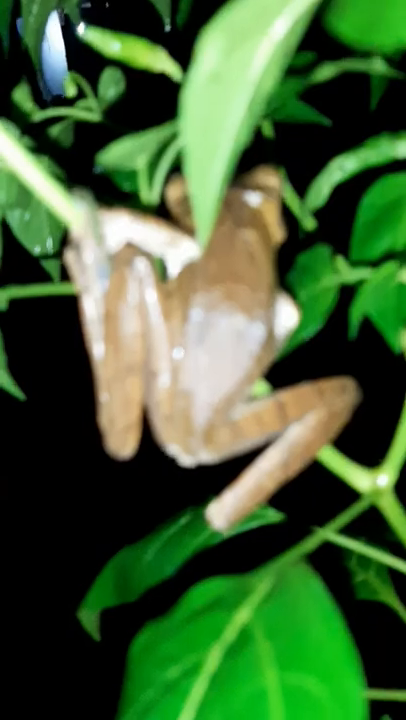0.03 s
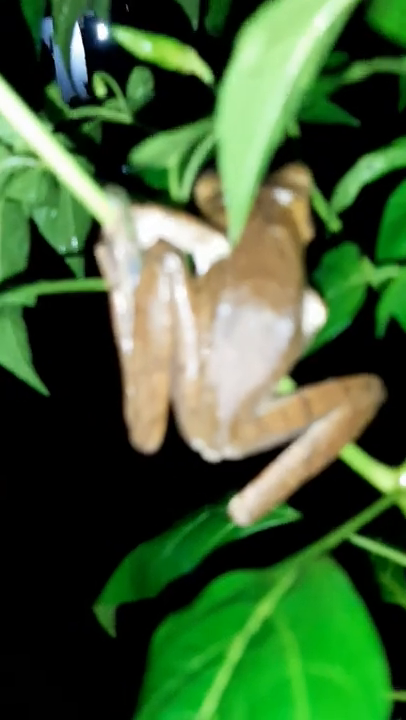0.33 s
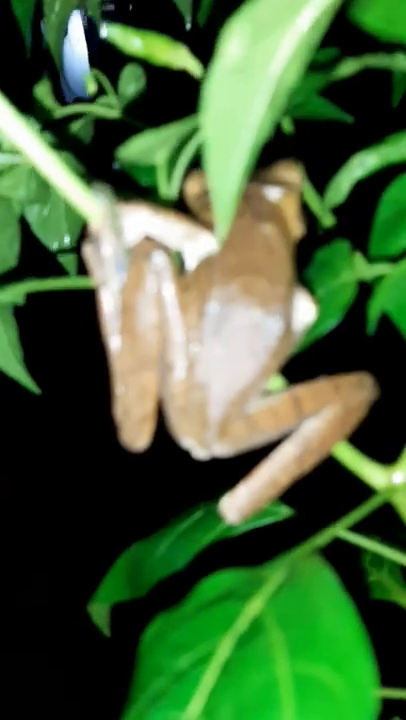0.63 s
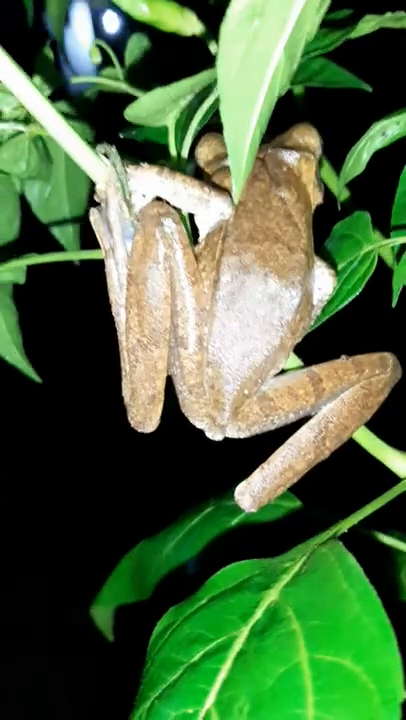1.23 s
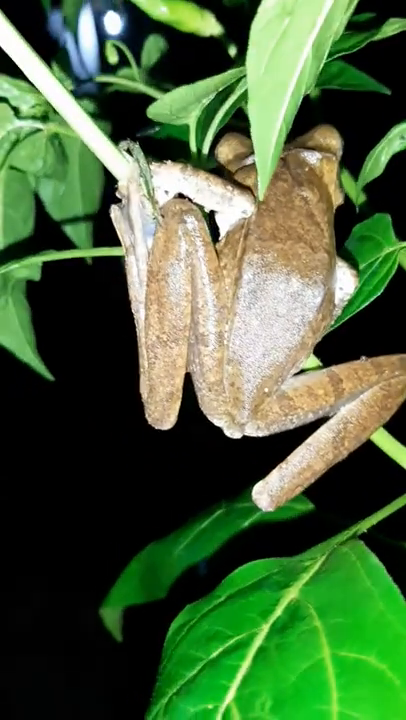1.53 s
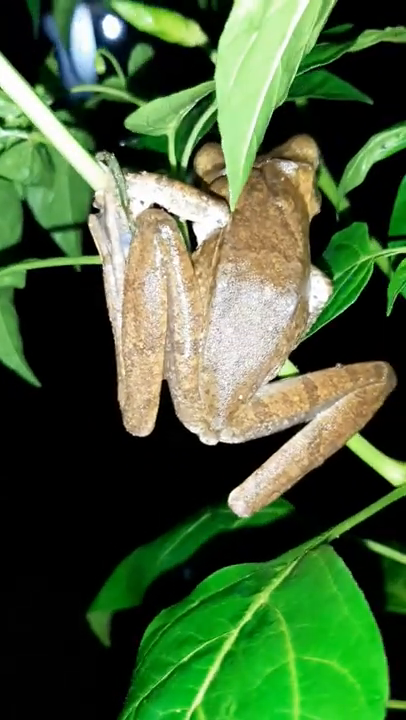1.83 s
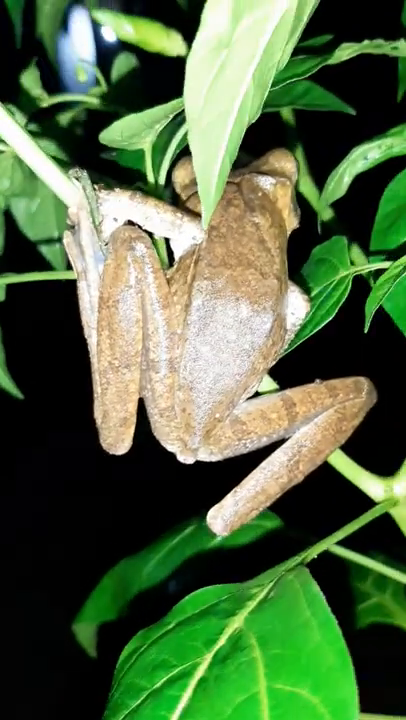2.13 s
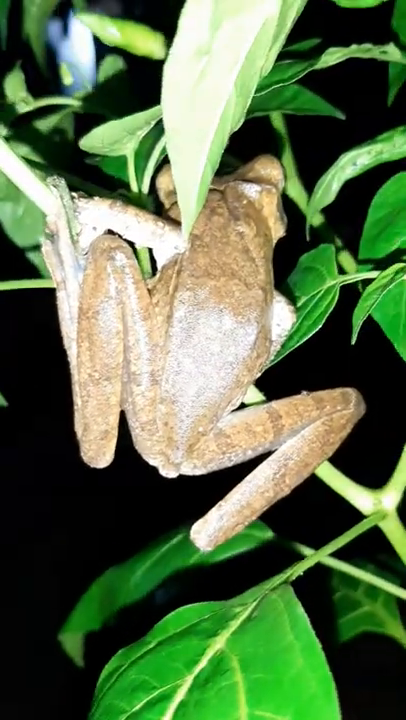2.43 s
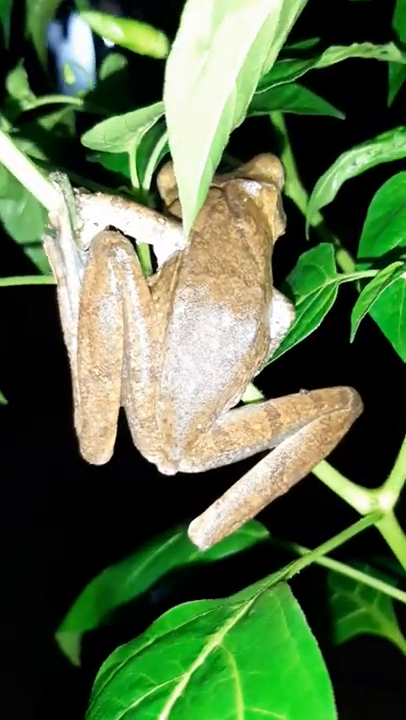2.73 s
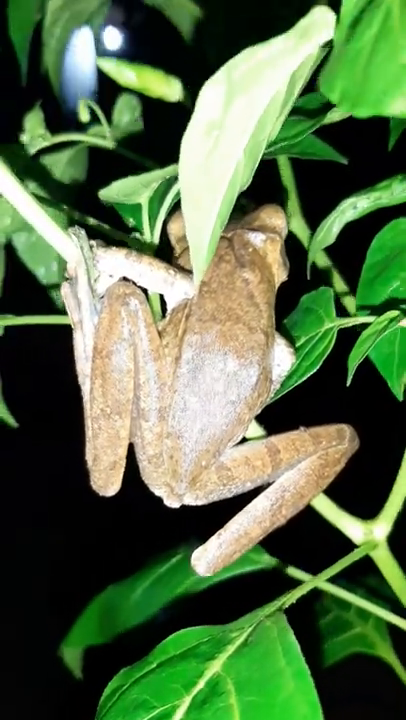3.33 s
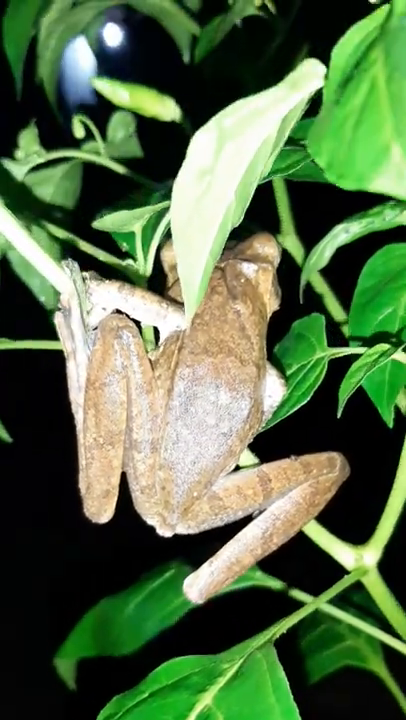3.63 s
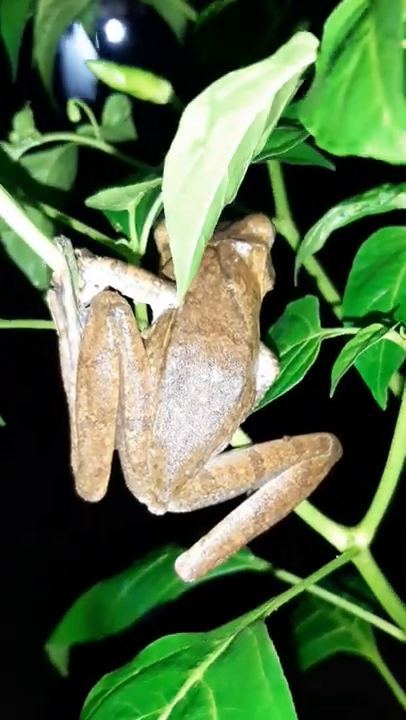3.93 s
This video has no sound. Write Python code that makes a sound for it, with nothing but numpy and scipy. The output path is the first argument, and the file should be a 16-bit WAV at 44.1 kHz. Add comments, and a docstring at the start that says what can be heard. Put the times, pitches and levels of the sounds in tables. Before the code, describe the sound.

A steady, high-pitched cricket chorus at night, with light microphone handling and rustling leaves.

```python
"""A farm garden at night, heard from a hand-held camera's microphone. From the start a dense cricket
chorus shrills over a lower, farther one, while a distant engine, perhaps a pump, drones under faint frogs.
At 0.6 s the hand bumps the camera and a bush cricket buzzes; a second buzz follows at 1.8 s.
Single insects chirp now and then until about 2.6 s. All along, close up, the hand rubs on the camera
and brushes through leaves, which rustle and tick, most busily near 3.6 s."""
import sys
import numpy as np
from scipy import signal
from scipy.fft import rfft, irfft
from scipy.io import wavfile

SR = 44100
rng = np.random.default_rng(int(sys.argv[2]) if len(sys.argv) > 2 else 0)


def digitize_waveform(pressure):
    """Quantize a signal to 16-bit integers and store it at the path in sys.argv[1].

    Rows of a 2-D input are taken as channels; values are limited to [-1, 1].
    """
    field = np.atleast_2d(pressure).T
    bounded = np.clip(field, -1, 1)
    quanta = np.round(bounded * 32767).astype(np.int16)
    wavfile.write(sys.argv[1], SR, quanta)


N = 176400
T = np.arange(N) / SR
HZ = np.fft.rfftfreq(N, 1 / SR)

# All levels are relative. Likeness of the left and right channels: f/Hz, correlation
STEREO_LIKENESS = [(30, 0.87), (150, 1), (300, 0.53), (600, 0.86), (1200, 0.017), (2500, 0.052),
                   (6000, 0.048), (15000, 0)]
# Night air and distant rumble: f/Hz, level/dB
AIR_SPECTRUM = [(15, 14), (30, -15), (48, 2.5), (75, 5), (130, 2), (230, 0), (300, -12), (390, -11.5),
                (800, -13.5), (1100, -18.5), (1500, -10), (2500, -15), (4700, -15.5), (7000, -15),
                (8300, -93), (9100, -24), (9600, -22), (10600, -33.5), (12600, -25), (15500, -31.5)]
# Swell of the air's hiss: t/s, level/dB
HISS_SWELL = [(.13, 3), (.5, 0.5), (1.15, 0), (1.5, 0), (2.05, 2), (2.45, -.5), (3.1, -1), (3.4, 0), (4, 2)]
# Swell of the rumble and of the engine's weaker orders: t/s, level/dB
RUMBLE_SWELL = [(.13, 0), (1, -0.5), (1.8, 1.5), (2.2, 0), (2.5, -1.5), (3.1, -0.5), (3.6, 0.5), (4, -0.5)]
# Pitch of the distant engine's drone, order 8: t/s, f/Hz
DRONE_PITCH = [(0.13, 102.8), (0.23, 103.0), (3.91, 102.9), (4.0, 100.3)]
# Strength of that drone: t/s, level/dB
DRONE_SWELL = [(0.13, -53.5), (0.61, -50.5), (0.89, -60.5), (1.07, -51.5), (1.86, -51), (1.9, -56),
               (2.27, -57), (2.32, -66), (2.87, -51.5), (3.08, -71), (3.2, -51), (3.48, -51), (3.52, -57),
               (3.79, -49), (3.89, -63.5), (4.0, -53)]
# Engine firing, order 4: t/s, level/dB
FIRING_SWELL = [(0.13, -54), (0.57, -66), (0.7, -52.5), (1.05, -59.5), (1.91, -54), (2.92, -63),
                (2.95, -85), (3.27, -61), (3.66, -60), (3.75, -80), (3.95, -56), (4.0, -66)]
# Weaker engine orders: multiple of the shaft rate, level/dB
WEAK_ORDERS = [(6, -72), (10, -83.5), (12, -71.5), (14, -71.5), (15, -62), (16, -68), (17, -60), (18, -68),
               (19, -65.5), (20, -69), (21, -66.5), (22, -75.5), (25, -75), (27, -79)]
# Far-off frog voices: f/Hz, width/Hz, level/dB
FROG_BANDS = [(1543, 77, -70.5), (2037, 92, -69), (1710, 600, -70.5)]
# Their coming and going: t/s, level/dB
FROG_SWELL = [(.13, 1.5), (.5, -3.5), (.8, 2), (1.2, -1.5), (1.5, 0), (2.0, 1), (2.35, 0.5), (2.9, -1),
              (3.1, -3), (3.35, 3), (3.55, -5), (4, 2)]
# Farther cricket chorus: f/Hz, level/dB
FAR_SPECTRUM = [(2400, -14), (3080, 0), (3300, 3.5), (3460, 3.5), (3620, -3), (3820, 4.5), (4100, 0),
                (4600, -8), (5400, -61)]
# Its swell: t/s, level/dB
FAR_SWELL = [(0.13, -60.5), (0.72, -65.5), (1.08, -59), (1.68, -59.5), (1.92, -62), (2.14, -57.5),
             (2.5, -59.5), (2.57, -56), (2.66, -58), (3.55, -61), (3.6, -59), (4.0, -55)]
# Pitch of its leading voices: t/s, f/Hz
FAR_LEAD_PITCH = [(.13, 3750), (.7, 3570), (1.0, 3754), (1.15, 3445), (1.5, 3645), (1.7, 3640),
                  (2.05, 3480), (2.4, 3480), (2.7, 3705), (3.0, 3684), (3.25, 3457), (3.6, 3380), (4, 3600)]
# Bush cricket buzzes: start t/s, length/s, level/dB
BUZZ_BURSTS = [(0.61, 0.37, -57.5), (1.818, 0.31, -58.5)]
# Single insects: start t/s, length/s, f/Hz, width/Hz, level/dB
INSECT_CHIRPS = [(0.121, 0.054, 4010, 280, -57.5), (0.892, 0.075, 4170, 200, -53),
                 (1.29, 0.084, 4230, 400, -53), (1.578, 0.076, 3980, 600, -58),
                 (1.653, 0.076, 4180, 300, -54), (2.49, 0.155, 4000, 755, -54.5)]
# Leaves brushed near the microphone: middle t/s, half length/s, level/dB
LEAF_RUSTLES = [(.27, .04, -66), (.42, 0.096, -66.5), (0.623, 0.029, -60.5), (1.64, 0.056, -63.5),
                (1.98, 0.038, -74), (2.353, .03, -63), (2.595, 0.046, -57.5), (2.74, .06, -66),
                (3.28, 0.023, -57.5), (3.37, 0.026, -58.5), (3.603, 0.017, -55.5), (3.67, 0.06, -59.5),
                (3.88, 0.068, -68), (3.99, 0.03, -54.5)]
# Their colour: f/Hz, level/dB
RUSTLE_SPECTRUM = [(2000, -16), (5000, 9), (7500, 10.5), (8400, -10.5), (9500, -2), (12300, 6),
                   (15500, -4.5)]
# Ticks and scuffs of leaves and twigs, and the scrape just after the camera bump at 0.64 s: t/s, level/dB,
# decay/s, f/Hz, width/octaves
CLOSE_TICKS = [(.5088, -67, .002, 12000, .4), (0.6386, -45, 0.014, 1050, 1),
               (.9343, -56, 0.0027, 12100, 0.24), (1.244, -51.5, 0.0024, 14200, 0.16),
               (1.384, -61, 0.0021, 13500, 0.27), (1.587, -54.5, 0.054, 1250, .65),
               (1.6617, -53, .002, 13500, .4), (1.8338, -55, .002, 14000, 0.25),
               (2.265, -48.5, .01, 1600, 0.46), (2.312, -52, .022, 1550, 0.18),
               (2.3413, -40, 0.0012, 4200, 1.7), (2.6235, -56, .002, 13700, .4),
               (3.278, -52, .005, 13000, 0.46), (3.566, -56, .004, 11000, 0.6),
               (3.571, -51, .003, 2400, 0.73), (3.578, -50, .002, 11500, 0.56),
               (3.584, -46, 0.0028, 8500, .9), (3.591, -46, .003, 2800, 0.33),
               (3.605, -42, 0.0028, 7990, .8), (3.607, -40.5, 0.0034, 5350, 0.4),
               (3.663, -32.5, 0.0013, 1950, 0.64), (3.667, -48.5, 0.016, 1940, 0.17),
               (3.8412, -55, 0.0016, 13000, .3), (3.977, -40.5, 0.0052, 1674, .25)]
# Hand rubbing on the camera: middle t/s, half length/s, level/dB, grip resonance f/Hz
HAND_RUBS = [(.25, 0.14, -59.5, 1330), (0.676, 0.072, -59, 1300), (0.924, 0.19, -61.5, 730),
             (1.635, 0.041, -54.5, 1400), (1.785, 0.26, -63.5, 700), (2.313, 0.047, -58, 1400),
             (2.6, 0.096, -62.5, 1900), (3.294, 0.02, -61.5, 1512), (3.663, 0.05, -55.5, 1570),
             (3.99, 0.037, -53.5, 1770)]
# Colour of the rubbing: f/Hz, level/dB
RUB_SPECTRUM = [(20, -35), (100, -30), (400, 0), (850, 5), (1600, -2), (2600, 4.5), (5000, -7.5),
                (9000, -43)]
# Contacts of the one bump: t/s, level/dB, left minus right/dB
BUMP_CONTACTS = [(0.6264, -31.5, -2), (0.6279, -34.5, -8), (0.6294, -36, -9), (0.6415, -42, -6),
                 (0.6494, -40, 10)]
# Modes of the camera's body: f/Hz, level/dB, T60/s
BODY_MODES = [(430, -6.5, 0.017), (706, -6, 0.01), (1310, -0.5, 0.011), (1780, -16, 0.0069),
              (3020, -13, 0.008), (3950, -9, 0.0082), (4960, -2, 0.0064)]
# Nearer cricket chorus: f/Hz, level/dB
CHORUS_SPECTRUM = [(5000, -39), (5650, -13.5), (5900, -2), (6120, 2), (6370, 5), (6630, 2), (6880, -3.5),
                   (7130, -16), (7520, -14), (8100, -74), (9000, -54)]
# Its swell: t/s, level/dB
CHORUS_SWELL = [(.13, -50), (.8, -51), (1.15, -49), (1.7, -50), (4, -50)]


def amp(db):
    """Decibels to gain."""
    return 10 ** (np.asarray(db) / 20)


def unit(x):
    """Scales to rms 1."""
    return x / np.sqrt(np.mean(x ** 2) + 1e-20)


def spectrum(points):
    """A frequency table at every FFT bin."""
    hz, value = np.transpose(points)
    return np.interp(np.log(HZ + 1), np.log(hz), value)


def curve(points):
    """A time table at every sample."""
    return np.interp(T, *np.transpose(points))


def swell(middle, half):
    """A smooth rise and fall around one moment."""
    return np.exp(-.5 * ((T - middle) / half) ** 2)


def pan(db):
    """Channel gains for a left-minus-right level."""
    return amp(np.array([[db], [-db]]) / 2)


def band(hz, width):
    """Gain of a resonant peak at every FFT bin."""
    return 1 / (1 + ((HZ - hz) / (.75 * width)) ** 2) ** 1.5


def drift(hz):
    """Slow random motion of rms 1."""
    return unit(irfft(rfft(rng.standard_normal(N)) / (1 + (HZ / hz) ** 4), N))


def noise(gain):
    """Stereo noise of a given spectrum, alike on both sides of the microphone in the bass."""
    left, other = rfft(rng.standard_normal((2, N)))
    likeness = spectrum(STEREO_LIKENESS)
    right = likeness * left + np.sqrt(1 - likeness ** 2) * other
    return unit(irfft(np.array([left, right]) * gain, N))


def friction(gain, snaps_per_s=1200, spread_db=5, snap_share=0.28):
    """A hiss mixed with tiny snaps of uneven size."""
    sizes = amp(spread_db * np.minimum(rng.exponential(1, N), 3))
    sizes *= rng.random(N) < snaps_per_s / SR
    snaps = unit(irfft(rfft(sizes * rng.standard_normal((2, N))) * gain, N))
    return np.sqrt(snap_share) * snaps + np.sqrt(1 - snap_share) * noise(gain)


def wing_strokes(hz, jitter):
    """A sharp rise and a decay with each stroke of the wings."""
    cycles = rng.random() + np.cumsum(hz * (1 + jitter * drift(6))) / SR
    return unit(np.exp(-(cycles % 1)))


def garden_echo(x, t60_s=0.67):
    """Diffuse echo from the vegetation."""
    tail = rng.standard_normal((2, SR)) * amp(-60 * T[:SR] / t60_s)
    return signal.fftconvolve(x, tail / np.linalg.norm(tail[0]), axes=1)[:, :N]


def night_air(split_hz=900):
    """Distant rumble and soft hiss all round; each swells and sinks."""
    whole = noise(amp(spectrum(AIR_SPECTRUM)))
    rumble = irfft(rfft(whole) / (1 + (HZ / split_hz) ** 4), N)
    air = (whole - rumble) * amp(curve(HISS_SWELL)) + rumble * amp(curve(RUMBLE_SWELL))
    return air * amp(-51 + .5 * drift(6.6))


def distant_engine(waver_depth=0.36):
    """Orders of a steady engine off to the right; the weaker ones waver on their way through the air."""
    shaft_phase = 2 * np.pi * np.cumsum(curve(DRONE_PITCH) / 8) / SR
    strong, weak = np.zeros((2, N))
    for order, levels in [(4, FIRING_SWELL), (8, DRONE_SWELL)]:
        strong += amp(curve(levels)) * np.cos(order * shaft_phase + 2 * np.pi * rng.random())
    for order, db in WEAK_ORDERS:
        waver = 1 + waver_depth * (drift(9.6) + 1j * drift(3.4))  # in level and phase
        tone = np.exp(1j * (order * shaft_phase + 2 * np.pi * rng.random()))
        weak += amp(db) * (waver * tone).real
    return np.sqrt(2) * (amp(-0.8) * strong + amp(curve(RUMBLE_SWELL)) * weak) * pan(db=-4.5)


def far_frogs():
    """Many frogs, far off to the right, blur into throbbing bands that come and go."""
    voices = sum(amp(db + 2.2 * drift(8.6)) * noise(band(hz, width)) for hz, width, db in FROG_BANDS)
    return pan(db=-4) * amp(curve(FROG_SWELL)) * voices


def far_crickets():
    """A lower chorus farther out, whose centre wanders as different voices take the lead."""
    carrier_hz = 3550  # this band is shifted to follow the leading pitch
    shift = np.exp(2j * np.pi * np.cumsum(curve(FAR_LEAD_PITCH) - carrier_hz) / SR)
    lead = (signal.hilbert(noise(band(carrier_hz, width=320))) * shift).real
    others = noise(amp(spectrum(FAR_SPECTRUM)))
    return (amp(-2) * lead + amp(-1.5) * others) * amp(curve(FAR_SWELL) + drift(11))


def bush_cricket(stroke_hz=96.5, edge_s=0.057, echo_db=-2, fade_db_per_s=33):
    """Even, rasping bursts of fast wing strokes, which linger among the plants."""
    direct, echo = np.zeros((2, N))
    for start, length, db in BUZZ_BURSTS:
        direct += amp(db) * np.clip(np.minimum(T - start, start + length - T) / edge_s, 0, 1)
        build_up = np.clip((T - start) / length, 0, 1)
        fade_db = fade_db_per_s * np.maximum(T - start - length, 0)
        echo += amp(db + echo_db - fade_db) * build_up
    colour = band(hz=5420, width=740)
    return direct * noise(colour) * wing_strokes(stroke_hz, jitter=0.0053) + echo * noise(colour)


def insect_chirps(stroke_hz=85.3, echo_db=1):
    """Short pulsed chirps of single insects swell and die away among the leaves."""
    direct = np.zeros((2, N))
    for start, length, hz, width, db in INSECT_CHIRPS:
        arch = np.sin(np.pi * np.clip((T - start) / length, 0, 1))
        direct += amp(db) * arch * noise(band(hz, width)) * wing_strokes(stroke_hz, jitter=0.057)
    return direct + amp(echo_db) * garden_echo(direct)


def leaves():
    """Leaves and twigs rustle and tick as the hand brushes through, close to the microphone; a scrape follows
    the camera bump."""
    brushing = sum(amp(db) * swell(middle, half) for middle, half, db in LEAF_RUSTLES)
    out = brushing * friction(amp(spectrum(RUSTLE_SPECTRUM)))
    for start, db, decay, hz, octaves in CLOSE_TICKS:
        envelope = (T >= start) * np.exp(-abs(T - start) / decay)
        colour = np.exp(-.5 * (np.log2((HZ + 1) / hz) / octaves) ** 2)
        out += amp(db) * envelope * noise(colour)
    return out


def hand_rubs():
    """Handling noise: the hand rubs on the camera, each grip with its own resonance."""
    out = np.zeros((2, N))
    for middle, half, db, hz in HAND_RUBS:
        grip = 1 + amp(3) * band(hz, width=1040)
        out += amp(db) * swell(middle, half) * friction(amp(spectrum(RUB_SPECTRUM)) * grip)
    return out


def camera_bump(attack_s=0.00022, left_lag_s=0.00013):
    """A knock and a short rattle ring the camera's body, reaching the left microphone later."""
    out = np.zeros((2, N))
    t = np.maximum(T[:SR // 10] - np.array([[left_lag_s], [0]]), 0)
    ring = sum(amp(db - 60 * t / t60) * np.sin(2 * np.pi * hz * t) for hz, db, t60 in BODY_MODES)
    ring *= np.minimum(t / attack_s, 1)
    for start, db, pan_db in BUMP_CONTACTS:
        first = round(start * SR)
        out[:, first:first + ring.shape[1]] += amp(db) * pan(pan_db) * ring
    return out


def cricket_chorus(groups=6, pulse_depth=0.08):
    """Groups of crickets in the garden, each stroking at its own rate, merge into one shrill chorus."""
    chorus = np.zeros((2, N))
    for _ in range(groups):
        shrill = noise(amp(spectrum(CHORUS_SPECTRUM)))
        stroke_hz = 44.7 * rng.uniform(0.55, 1.5)
        chorus += shrill * (1 - pulse_depth + pulse_depth * wing_strokes(stroke_hz, jitter=0.078))
    return amp(curve(CHORUS_SWELL)) * unit(chorus)


def scene():
    """The garden sits a little right of the microphone's axis; engine and bump are placed separately."""
    insects = cricket_chorus() + far_crickets() + insect_chirps() + bush_cricket()
    garden = insects + far_frogs() + night_air() + leaves() + hand_rubs()
    return garden * pan(db=-4) + distant_engine() + camera_bump()


def record(dry, open_s=0.116, low_cut_hz=30, high_cut_hz=15600):
    """The microphone opens after a moment of silence and drops the deepest bass and the top treble."""
    opened = dry * np.clip((T - open_s) / .001, 0, 1)
    low_cut = signal.butter(3, low_cut_hz, "highpass", fs=SR, output="sos")
    high_cut = signal.firwin(511, high_cut_hz, window=("kaiser", 9), fs=SR)
    return signal.oaconvolve(signal.sosfilt(low_cut, opened), high_cut[None], "same")


dry = scene()
out = record(dry)
digitize_waveform(out)
```